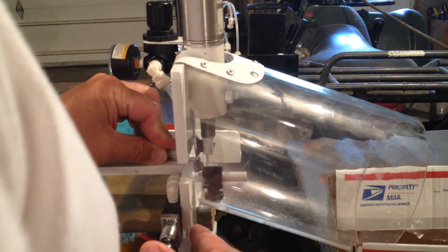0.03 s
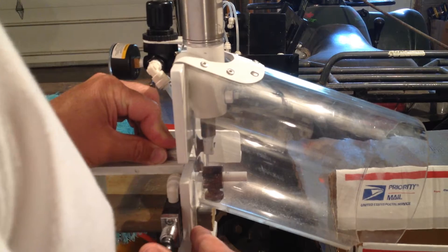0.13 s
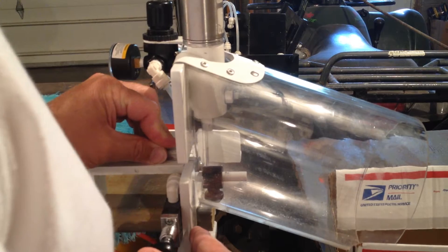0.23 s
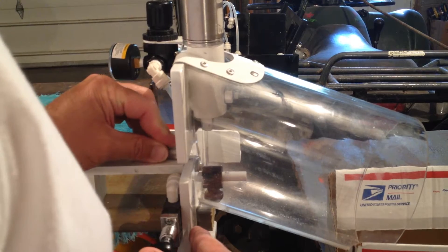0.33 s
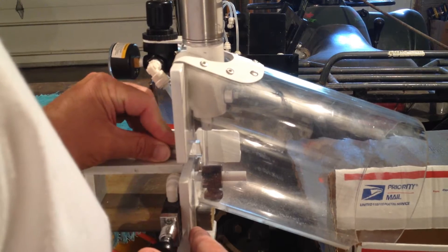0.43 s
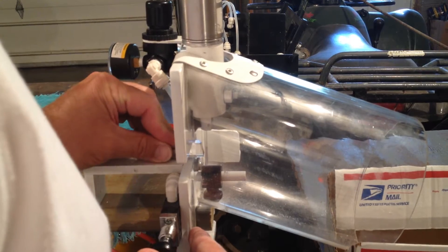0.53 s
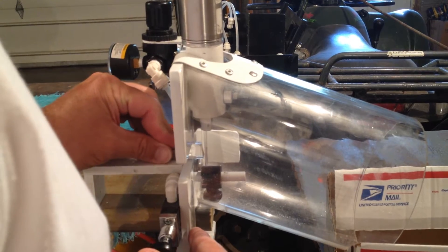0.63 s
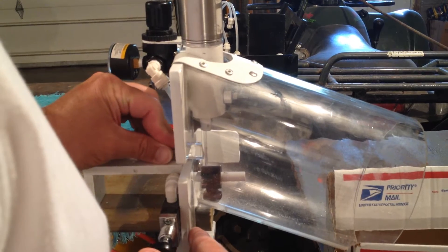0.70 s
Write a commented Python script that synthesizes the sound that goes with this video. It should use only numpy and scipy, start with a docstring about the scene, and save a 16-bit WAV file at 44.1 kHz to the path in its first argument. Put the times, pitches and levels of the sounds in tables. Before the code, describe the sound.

An air-driven cutter clicks, hisses and thuds, then snaps through glass with another hiss.

```python
"""An air-driven cutter chops glass cane on a workshop bench, close up, over a machine's hum in a live room.
The first stroke opens with a valve click, lets out a short hiss of air and lands with a hollow thud.
The cane ticks and crunches against the blades, then the second stroke cracks it and rings the frame.
Air hisses from the exhaust port again, and the cut piece scrapes and bounces down a plastic chute."""
import sys
import numpy as np
from scipy import signal
from scipy.fft import rfft, irfft
from scipy.io import wavfile

SR = 44100
rng = np.random.default_rng(int(sys.argv[2]) if len(sys.argv) > 2 else 0)


def transcribe(u):
    """Save the signal u as a 16-bit wav file named by the first command-line argument.

    u: samples, shape (n,) or (channels, n), limited to [-1, 1]; the rate is SR.
    q: integer samples, one column per channel.
    """
    v = np.clip(np.atleast_2d(u).T, -1, 1)
    q = np.round(v * 32767).astype(np.int16)
    wavfile.write(sys.argv[1], SR, q)


N = 79380
T = np.arange(SR * 2 // 5) / SR  # time axis of one hit; every t60 is the time to fall 60 dB

# blade blows: t/s, level/dB, rise/s, hold/s, t60/s, frame/dB, crack and ring tilts/(dB per octave)
BLOWS = [(1.2129, -9, 0.00072, 0.0024, 0.0178, 1, -.6, 1),
         (1.2322, -12, .0003, 0.00042, 0.0728, -9, 0.4, -3),
         (1.234, -13, 0.00048, 0.0015, 0.0315, -4.5, -1.65, -4.5)]
# colour of the cracking cane: f/Hz, level/dB
CRACK_COLOUR = [(30, -4.5), (110, -22), (220, -17.5), (600, -10), (1100, -1.5), (2000, 5), (3000, -3),
                (4700, 1), (6000, -2.5), (7000, -3), (9000, -2), (12000, -10), (15000, -10.5)]
# ring of the cutter frame: f/Hz, level/dB, t60/s
FRAME_MODES = [(213.1, -25, 0.95), (897, -20, 0.033), (1682, -3, 0.02), (2110, -16, 0.035),
               (2370, -12, 0.021), (4240, -9, 0.018), (4674, 1.5, 0.015), (8060, -12, .02)]
FRAME_RING_DB, FRAME_RATTLE_DB = -4.5, -11.5

# puffs of exhaust air: t/s, level/dB, rise/s, hold/s, t60/s
PUFFS = [(0.148, -11, .002, 0.018, 0.1657), (1.3407, -14.5, 0.0025, 0.028, 0.1864)]
# colour of the hiss: f/Hz, level/dB
AIR_COLOUR = [(30, -29.5), (120, -29), (250, -19.5), (800, -20.5), (1250, -8.5), (2200, -5.5),
              (2900, -14.5), (3700, -7), (4350, -4.5), (4700, 4), (5750, 3), (6500, -3), (7700, -0.5),
              (9000, 1), (10100, -0.5), (10800, -6.5), (12600, -1.5), (14200, -7.5), (15000, -6)]
# whistles of the exhaust port: f/Hz, width/Hz, level/dB
PORT_WHISTLES = [(4800, 90, -10.5), (4993, 45, -13.5), (5650, 200, -12), (8020, 65, -21.5),
                 (9850, 130, -22)]
SPIT_DB = -6.5

# opening valve click: t/s, level/dB, hold/s, t60/s
CLICK = (.0724, -9.5, .0006, .008)
# its quick echoes: delay/s, level/dB
CLICK_ECHOES = [(.0013, -10.5), (.0036, -8), (.0055, -11.5)]
# colour of the click: f/Hz, level/dB
CLICK_COLOUR = [(100, -15.5), (330, -19.5), (580, -11.5), (900, -10.5), (1500, -4.5), (2400, -8),
                (3700, -0.5), (4800, 3), (6500, -7.5), (9000, -6.5), (12000, -9.5), (15000, -13)]
# ring of the valve body: f/Hz, level/dB, t60/s
VALVE_MODES = [(582, -21, 0.17), (1503, -19, 0.075), (1601, -25, .1), (2667, -27, 0.12), (3680, -21, .05),
               (4260, -15, 0.049), (4755, -11.5, .04), (5310, -20.5, .09)]
VALVE_RATTLE_DB = -15

# thud and rebounds: t/s, level/dB, noise layer/dB
THUDS = [(0.2169, -13.5, -10.5), (0.246, -38.5, 8), (0.3265, -39, 11)]
# ring of the hollow body: f/Hz, level/dB, t60/s
HOLLOW_MODES = [(187, -17.5, 0.35), (334, -14.5, 0.064), (376, -3, 0.081), (418, -13, 0.12),
                (871, -.5, 0.016), (1205, -9, 0.018), (1510, -2, .011)]
# colour of the thud's noise layer: f/Hz, level/dB
THUD_COLOUR = [(60, -34), (250, -15), (500, 1), (900, -5), (1700, 1.5), (2400, -12), (5000, -30),
               (15000, -47)]
THUD_RISE_S, THUD_HOLD_S = 0.0023, 0.0029

# bounces of the cut piece: t/s, level/dB, f/Hz, tap/dB
BOUNCES = [(1.459, -28.5, 796, -14), (1.4805, -18.5, 772, -0.5), (1.521, -27, 1306, -8),
           (1.5545, -25.5, 810, -5), (1.587, -27.5, 870, -12), (1.6145, -29, 812, -10),
           (1.634, -30, 854, -2), (1.657, -40, 885, -1), (1.680, -39, 1190, -12), (1.7059, -24, 782, -14),
           (1.7666, -27.5, 1020, -8)]
# ring of the plastic chute: ratio to the bounce's f, level/dB, t60/s
CHUTE_MODES = [(.78, -9.5, 0.027), (1, -0.5, 0.027), (1.11, -9.5, 0.026), (2.05, -12, .025)]
# colour of a tap on plastic: f/Hz, level/dB
TAP_COLOUR = [(40, -10), (150, -15), (500, -2.5), (1600, 2.5), (2600, -9), (3600, 0.5), (5000, -2.5),
              (7000, -14.5), (12000, -16), (15000, -24)]
TAP_RISE_S, TAP_HOLD_S, CHUTE_DETUNE = 0.0017, 0.0018, 0.026
# envelope of the sliding piece: t/s, level/dB
SCRAPE_ENVELOPE = [(1.40, -57), (1.46, -35.5), (1.53, -41), (1.64, -42), (1.72, -48), (1.8, -52.5)]
# colour of its scrape: f/Hz, level/dB
SCRAPE_COLOUR = [(100, -27), (350, 5), (900, -0.5), (1600, 5.5), (2600, -6.5), (4800, -7), (8000, -18.5),
                 (15000, -28.5)]

# cane ticking against the blades: t/s, level/dB
TICKS = [(0.7704, -52.5), (0.781, -52), (0.806, -53.5), (0.8123, -65), (0.879, -58), (0.893, -60),
         (1.185, -47), (1.192, -40.5), (1.202, -35), (1.2079, -38.5)]
# colour of a glass tick: f/Hz, level/dB
GLASS_COLOUR = [(100, -2), (1500, 2.5), (4000, -3), (6000, -1.5), (8500, -5), (12000, -9), (15000, -18)]

# machine hum: f/Hz, level/dB
HUM = [(916, -54.5)]
# colour of the workshop's noise bed: f/Hz, level/dB
BED_COLOUR = [(30, -40), (86, -28), (125, -16), (170, -4.5), (230, -2), (310, -5.5), (440, -6.5), (670, -8),
              (900, -7.5), (1100, -12.5), (1800, -16), (3000, -28.5), (4000, -31.5), (5100, -29.5),
              (6500, -40), (11000, -45.5), (16000, -54)]
HUM_WAVER, BED_DB = 0.003, -48

# colour of the early echoes off bench and chute: f/Hz, level/dB
BENCH_COLOUR = [(150, -20), (500, -7.5), (900, -4.5), (2200, -8), (4500, -18.5), (14000, -20.5)]
BENCH_GAP_S, BENCH_T60_S = 0.007, 0.11
# decay of the room: f/Hz, t60/s
ROOM_T60 = [(150, 0.7), (400, 0.87), (1500, 0.92), (3000, 0.92), (5500, 0.69), (9000, 0.54), (14000, .37)]
# reverb send EQ for most sounds: f/Hz, level/dB
ROOM_SEND = [(100, -6), (200, 6.5), (370, -0.5), (600, 3), (1000, -5), (1400, 0), (3000, -3.5),
             (4200, -3.5), (4900, -12), (6500, -4), (9000, -9.5), (14000, -12.5)]
# send EQ for the snaps, a mid-heavy tail with little boom or treble: f/Hz, level/dB
SNAP_SEND = [(100, -7), (220, -7), (300, -2), (450, 8), (700, 1.5), (1250, 3), (1700, -3), (3000, -2),
             (4100, -9), (4700, -13), (5300, -9.5), (9000, -12.5), (14000, -13)]
ROOM_GAP_S, ROOM_BUILD_S = 0.0069, 0.03
LOW_CUT_HZ, CHUTE_CUT_HZ, HIGH_CUT_HZ = 166, 460, 15400
START_S = 0.07


def snaps():
    """Each blade blow is a dense crack that sets the frame ringing and rattling; the last rings dullest."""
    out = np.zeros(N)
    for s, db, rise, hold, t60, frame_db, crack_tilt, ring_tilt in BLOWS:
        crack = noise(CRACK_COLOUR, crack_tilt) * burst(rise, hold, t60)
        rattle = amp(FRAME_RATTLE_DB) * noise(CRACK_COLOUR, crack_tilt) * burst(0.0025, hold, t60=0.1)
        modes = [(hz, mode_db + ring_tilt * np.log2(max(hz, 1600) / 2800), ring_s)
                 for hz, mode_db, ring_s in FRAME_MODES]
        ring = amp(FRAME_RING_DB) * soft_ring(modes, rise=0.00096, hold=hold)
        add(out, s, amp(db) * (crack + amp(frame_db) * (rattle + ring)))
    return out


def exhaust():
    """Air spits from the opening valve, rushes through the whistling port and dies as the cylinder empties."""
    out = np.zeros(N)
    for s, db, rise, hold, t60 in PUFFS:
        hiss = noise(AIR_COLOUR)
        whistles = sum(amp(level) * narrow_noise(hz, width) for hz, width, level in PORT_WHISTLES)
        jet = unit(hiss + whistles) * burst(rise, hold, t60)
        spit = amp(SPIT_DB) * noise(AIR_COLOUR, tilt_db=5) * burst(0.001, 0.003, t60=0.035)
        add(out, s, amp(db) * (jet + spit))
    return out


def valve_click():
    """A dry click and its quick echoes, with the ring and rattle of the valve body."""
    s, db, hold, t60 = CLICK
    out = np.zeros(N)
    for delay, echo_db in [(0.00054, 0)] + CLICK_ECHOES:  # the direct click comes first
        add(out, s + delay, amp(db + echo_db) * noise(CLICK_COLOUR) * burst(0.0001, hold, t60))
    rattle = amp(VALVE_RATTLE_DB) * noise(CLICK_COLOUR) * burst(0.0018, 0.003, t60=0.096)
    ring = low_cut(hard_ring(VALVE_MODES), hz=1000, order=2)
    add(out, s, amp(db) * (ring + rattle))
    return out


def thuds():
    """A soft blow on a hollow body and its rebounds, each with a puff of noise on the attack."""
    out = np.zeros(N)
    for s, db, puff_db in THUDS:
        body = soft_ring(HOLLOW_MODES, THUD_RISE_S, THUD_HOLD_S)
        puff = amp(puff_db) * noise(THUD_COLOUR) * burst(0.00023, THUD_HOLD_S, t60=0.027)
        add(out, s, amp(db) * (body + puff))
    return out


def bounces():
    """The cut piece clatters down the chute with dull taps, ringing a different spot each time."""
    out = np.zeros(N)
    for s, db, hz, tap_db in BOUNCES:
        tap = amp(tap_db) * noise(TAP_COLOUR) * burst(TAP_RISE_S, TAP_HOLD_S, t60=0.023)
        spot = [(hz * ratio * (1 + CHUTE_DETUNE * rng.standard_normal()), mode_db, t60)
                for ratio, mode_db, t60 in CHUTE_MODES]
        add(out, s, amp(db) * (soft_ring(spot, TAP_RISE_S, TAP_HOLD_S) + tap))
    return out


def scrape():
    """The piece slides on the plastic with a dull scrape."""
    envelope_db = np.interp(np.arange(N) / SR, *np.transpose(SCRAPE_ENVELOPE), left=-np.inf)
    return noise(SCRAPE_COLOUR, size=N) * amp(envelope_db)


def ticks():
    """Tiny bright clicks of glass on the blades."""
    out = np.zeros(N)
    for s, db in TICKS:
        add(out, s, amp(db) * noise(GLASS_COLOUR) * burst(0.00021, 0.00083, t60=0.024))
    return out


def machine():
    """A slightly wavering hum over a steady bed of workshop noise."""
    speed = 1 + HUM_WAVER * narrow_noise(hz=0, width_hz=8, size=N)
    hum = sum(amp(db) * np.sqrt(2) * np.sin(2 * np.pi * hz * np.cumsum(speed) / SR) for hz, db in HUM)
    return hum + amp(BED_DB) * noise(BED_COLOUR, size=N)


def bench(x):
    """A quick cluster of dull echoes off the surfaces around the cutter."""
    echoes = rng.standard_normal(len(T)) * fade(T, BENCH_T60_S) * (T > BENCH_GAP_S)
    return signal.fftconvolve(x, colour(echoes / np.linalg.norm(echoes), BENCH_COLOUR))[:N]


def room(x, send_eq):
    """A diffuse tail that builds quickly and loses its top end first."""
    hz, t, bands = signal.stft(rng.standard_normal(SR), SR, nperseg=256)
    t60 = read(ROOM_T60, hz)[:, None]
    equal_energy = np.sqrt(2 * np.log(1000) / (t60 * SR))  # longer bands start quieter
    bands = bands * fade(t, t60) * amp(read(send_eq, hz))[:, None] * equal_energy
    tail = signal.istft(bands, SR, nperseg=256)[1][:SR]
    build = np.clip((np.arange(SR) / SR - ROOM_GAP_S) / ROOM_BUILD_S, 0, 1)
    return signal.fftconvolve(x, tail * build)[:N]


def hard_ring(modes):
    """Dying sines of a sharply struck object."""
    return sum(amp(db) * fade(T, t60) * np.cos(2 * np.pi * hz * T) for hz, db, t60 in modes)


def soft_ring(modes, rise, hold):
    """Modes that swell over a soft or lasting contact, then die away."""
    return sum(amp(db) * burst(rise, hold, t60) * np.sin(2 * np.pi * (hz * T + rng.random()))
               for hz, db, t60 in modes)


def noise(spectrum, tilt_db=0, size=len(T)):
    """Coloured noise of rms 1."""
    return unit(colour(rng.standard_normal(size), spectrum, tilt_db))


def narrow_noise(hz, width_hz, size=len(T)):
    """Noise of rms 1 in one narrow resonance."""
    f = np.fft.rfftfreq(size, 1 / SR)
    return unit(irfft(rfft(rng.standard_normal(size)) / (1 + ((f - hz) / width_hz) ** 2), size))


def burst(rise, hold, t60):
    """Envelope: linear attack, exponential release from the hold time on."""
    return np.minimum(T / rise, 1) * fade(np.maximum(T - hold, 0), t60)


def fade(t, t60):
    """Falls 60 dB in t60."""
    return np.exp(-np.log(1000) * t / t60)


def colour(x, spectrum, tilt_db=0):
    """EQ curve with an added tilt per octave."""
    hz = np.fft.rfftfreq(len(x), 1 / SR)
    return irfft(rfft(x) * amp(read(spectrum, hz) + tilt_db * np.log2(hz + 1)), len(x))


def low_cut(x, hz, order):
    """High-pass filter."""
    return signal.sosfilt(signal.butter(order, hz, "high", fs=SR, output="sos"), x)


def read(points, hz):
    """Reads a curve on a log-frequency axis."""
    f, value = np.transpose(points)
    return np.interp(np.log(hz + 1), np.log(f + 1), value)


def amp(db):
    """Decibels to gain."""
    return 10 ** (np.asarray(db) / 20)


def unit(x):
    """Scales to rms 1."""
    return x / np.sqrt(np.mean(x ** 2) + 1e-20)


def add(mix, s, sound):
    """Mixes a sound in at time s."""
    part = mix[round(s * SR):][:len(sound)]
    part += sound[:len(part)]


def scene():
    """The mono mix; the microphone thins the bass of the cutter's sounds and their echoes."""
    valve, snap, air, tick = valve_click(), snaps(), exhaust(), ticks()
    thud = low_cut(thuds(), LOW_CUT_HZ, order=2)
    bounce = low_cut(bounces(), CHUTE_CUT_HZ, order=2)
    early = bench(amp(4) * valve + amp(-5) * snap + amp(-9.5) * thud + amp(-6.5) * bounce)
    close = valve + snap + air + thud + bounce + scrape() + tick
    send = amp(2.5) * valve + amp(-0.68) * air + amp(-7) * thud + amp(-9.5) * bounce + amp(1) * tick
    reverb = room(send, ROOM_SEND) + room(snap, SNAP_SEND)
    return (low_cut(close + early + reverb, LOW_CUT_HZ, order=4) + machine())[None]


def record(dry, ceiling=0.75):
    """The microphone opens, rounds off the highest peaks and trims the top end."""
    live = dry * np.clip((np.arange(N) / SR - START_S) / 0.002, 0, 1)
    rounded = live / (1 + (live / ceiling) ** 4) ** (1 / 4)
    high_cut = signal.firwin(255, HIGH_CUT_HZ, window=("kaiser", 8), fs=SR)
    return signal.oaconvolve(rounded, high_cut[None], "same")


dry = scene()
out = record(dry)
transcribe(out)
```